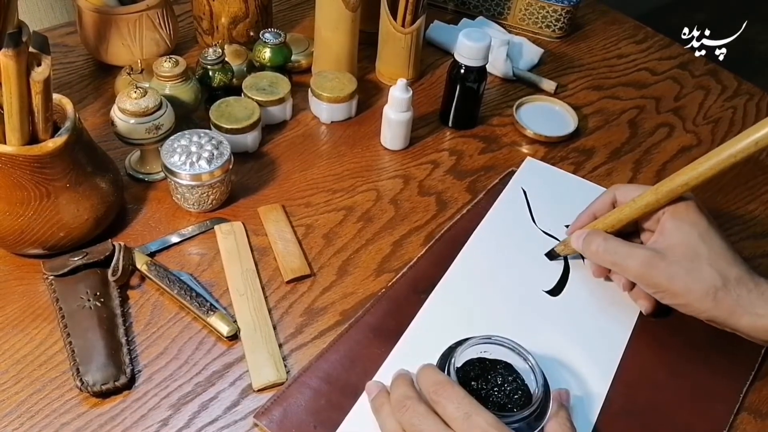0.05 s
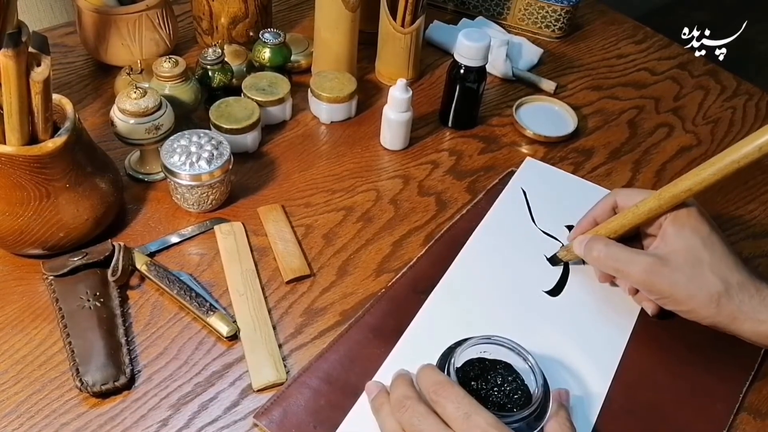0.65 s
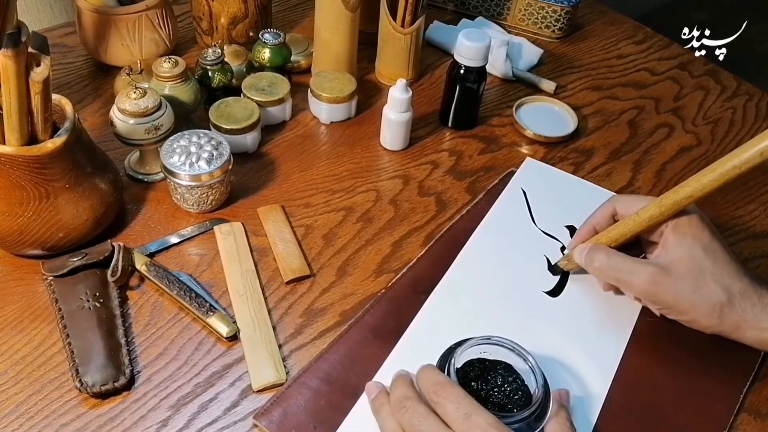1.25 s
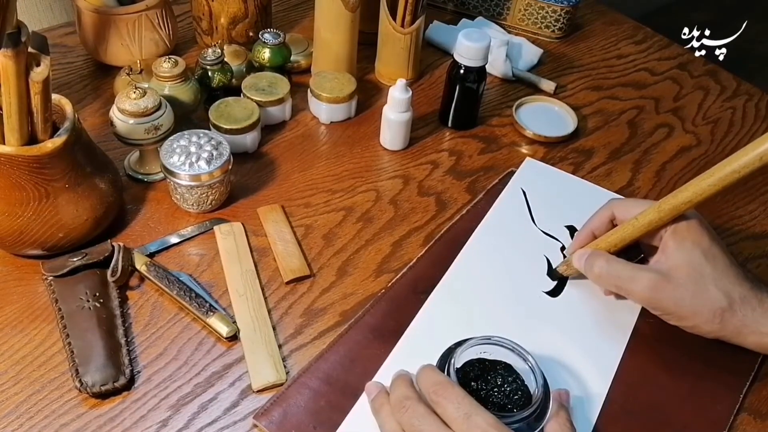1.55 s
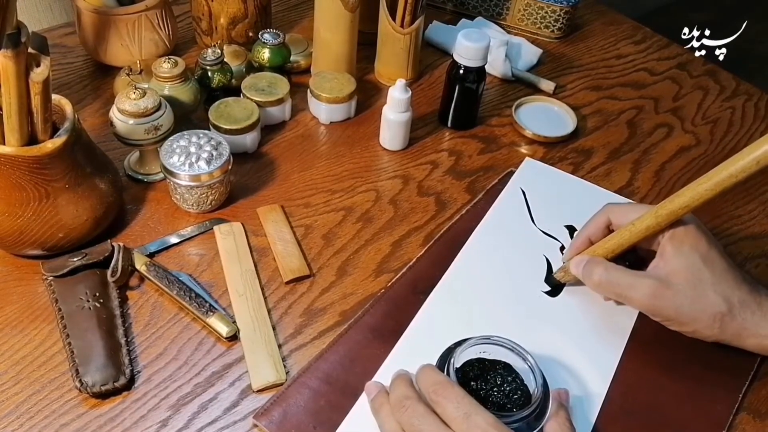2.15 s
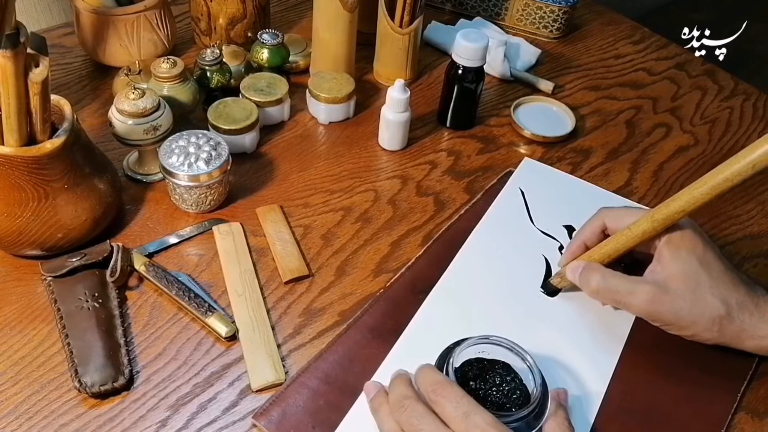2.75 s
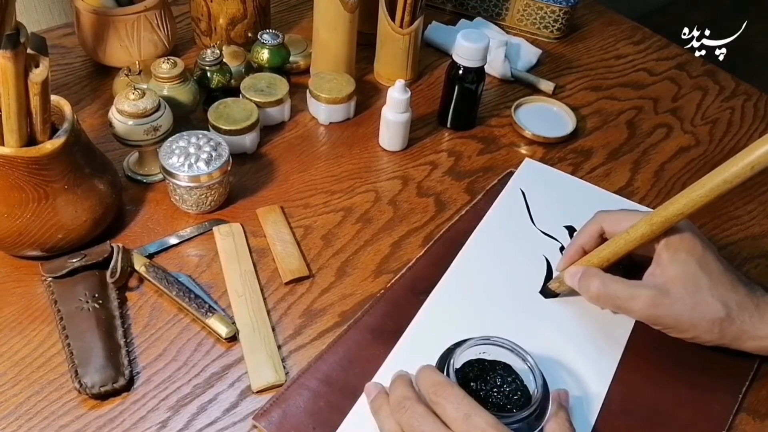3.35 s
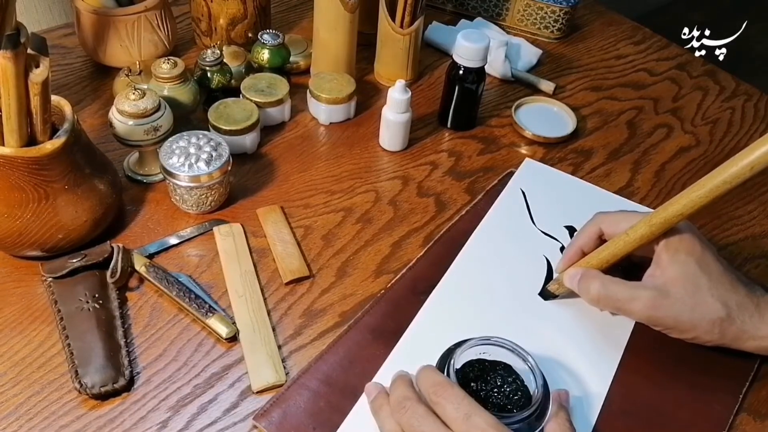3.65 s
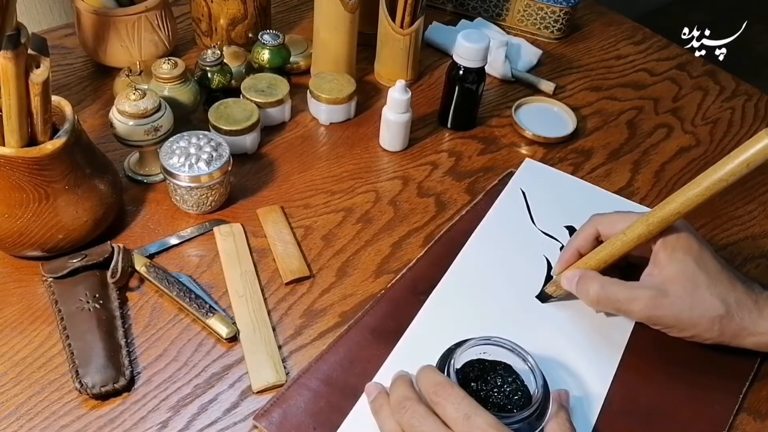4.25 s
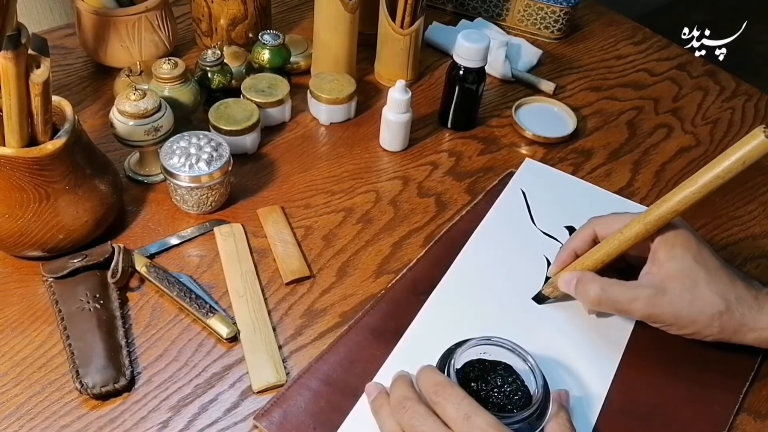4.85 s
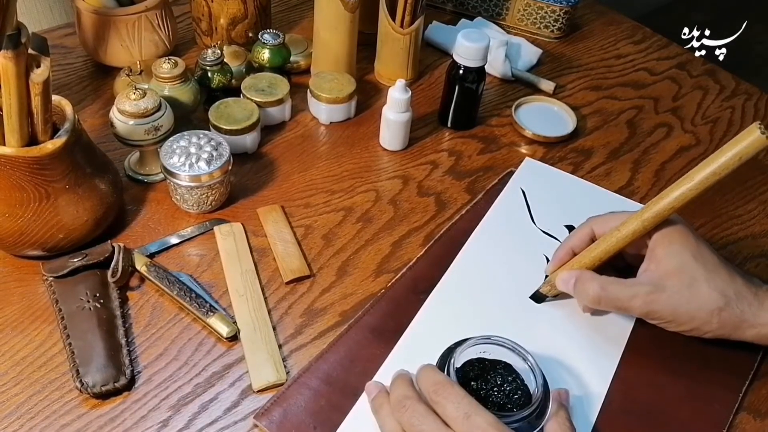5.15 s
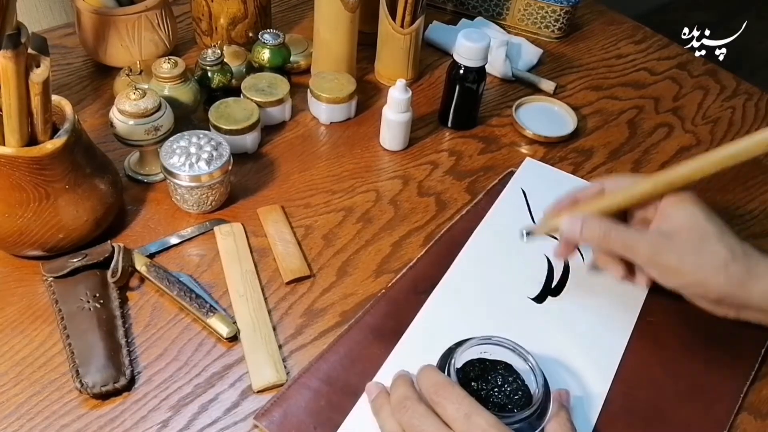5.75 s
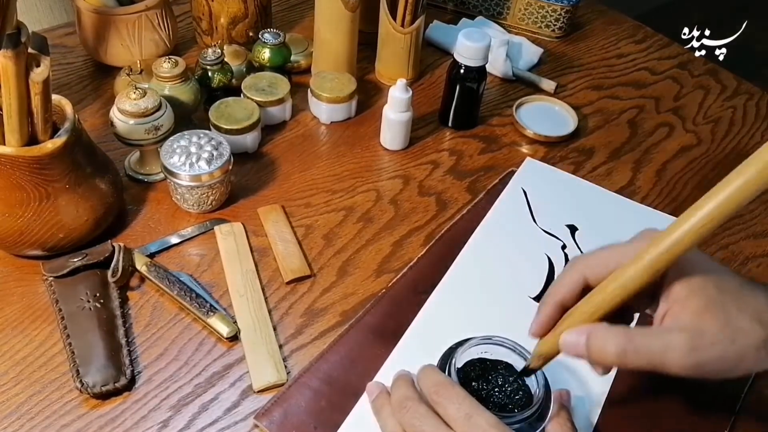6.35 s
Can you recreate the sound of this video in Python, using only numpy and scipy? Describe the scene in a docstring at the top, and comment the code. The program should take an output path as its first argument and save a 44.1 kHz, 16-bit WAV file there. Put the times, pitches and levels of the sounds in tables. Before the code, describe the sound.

Short, high squeaks of a reed nib dragged over glossy paper, the second stroke hoarser, with a soft machine hum behind.

```python
'''A machine hums and throbs in a small quiet room, and glossy paper rustles faintly on a wooden desk.
A reed pen is drawn slowly over it in two strokes, the nib sticking and slipping in short squeaks:
a light grip gives thin whistles, a firm one full reedy tones, and the second stroke is lower and hoarser.
The hands shift on the desk with a dull rumble, and three faint hollow tones come and go.'''
import sys
import numpy as np
from scipy import signal
from scipy.fft import rfft, irfft, next_fast_len
from scipy.io import wavfile

SR = 44100
rng = np.random.default_rng(int(sys.argv[2]) if len(sys.argv) > 2 else 0)


def output_pcm(signal):
    """Save a mono or channel-first signal as 16-bit PCM at the path in sys.argv[1].

    Samples are clipped to [-1, 1] before scaling.
    """
    pcm = np.clip(np.atleast_2d(signal).T, -1, 1) * 32767
    wavfile.write(sys.argv[1], SR, np.round(pcm).astype(np.int16))


N = 282636
TIME = np.arange(N) / SR
LEAD_S = .008   # space either side of a squeak for its fades


def from_db(db):
    """Decibels to gain."""
    return 10 ** (np.asarray(db) / 20)


def rms_one(x):
    """Scale to rms 1."""
    return x / np.sqrt(np.mean(x ** 2) + 1e-20)


def at_hz(points, hz):
    """Read a table of frequency and value on a log-frequency axis."""
    knots, values = np.transpose(points)
    return np.interp(np.log(np.maximum(hz, 1)), np.log(np.maximum(knots, 1)), values)


def curve(rows, seconds):
    """Read each column of an automation table at these times."""
    knots, *columns = np.transpose(rows)
    return [np.interp(seconds, knots, column) for column in columns]


def bins(size):
    """Frequencies of a spectrum of this many samples."""
    return np.arange(size // 2 + 1) * SR / size


def coloured(x, spectrum):
    """Equalise by a table of frequency in Hz and gain in dB."""
    size = x.shape[-1]
    return irfft(rfft(x) * from_db(at_hz(spectrum, bins(size))), size)


def drift(rate_hz, size):
    """Smooth random modulation, rms near 1, that moves at about this rate."""
    padded = next_fast_len(size + SR // 10)
    spectrum = rfft(rng.standard_normal(padded)) / (1 + (bins(padded) / rate_hz) ** 2)
    return rms_one(irfft(spectrum, padded))[:size]


def add(track, start_s, sound):
    """Mix a sound into a track."""
    i = max(round(start_s * SR), 0)
    track[i:i + len(sound)] += sound[:max(N - i, 0)]


def room_noise(spectrum):
    """Diffuse stereo noise at rms 1: centred in the bass, wide in the treble."""
    # Each row: frequency in Hz, correlation of left and right.
    likeness = [(30, .92), (150, 0.88), (280, 0.71), (500, 0.49), (1000, -0.091), (3000, -0.042),
                (16000, 0.21)]
    size = next_fast_len(N)
    alike = at_hz(likeness, bins(size))
    mid, side = rfft(rng.standard_normal((2, size)))
    pair = np.sqrt(1 + alike) * mid + np.sqrt(1 - alike) * side * [[1], [-1]]
    return rms_one(irfft(pair * from_db(at_hz(spectrum, bins(size))), size)[:, :N])


def machine_hum(throb_hz=5.3, throb_db=5.0, throb_peak_s=.02, waver_hz=6.0, usual_db=-54):
    """A machine in the background: five low tones that throb together and waver separately."""
    # The hum's tones. Each row: frequency in Hz, offset in dB, share of the level swing it follows.
    tones = [(65, -13.5, .6), (101.2, -11.5, 0.84), (122.6, -13, 0.4), (170, -13, .3), (199.6, -3, 1)]
    # The level ride under the throb. Each row: time in seconds, level in dB.
    ride = [(0, -54), (1.1, -54), (1.35, -59), (2.3, -55.5), (2.45, -45.5), (2.87, -52), (3.1, -64.5),
            (3.22, -46), (3.53, -58), (3.76, -44.5), (3.8, -67), (4.6, -65.5), (4.74, -52.5), (4.96, -46),
            (5.22, -54), (5.5, -47.5), (5.8, -50), (6.4, -52)]
    throb = throb_db * np.cos(2 * np.pi * throb_hz * (TIME - throb_peak_s))
    swing_db = curve(ride, TIME)[0] + throb - usual_db
    hum = 0
    for hz, offset_db, follows in tones:
        turns = hz * TIME + .05 * drift(waver_hz, N) + rng.random()
        level_db = usual_db + offset_db + follows * swing_db + 2.0 * drift(waver_hz, N)
        hum = hum + np.sqrt(2) * from_db(level_db) * np.sin(2 * np.pi * turns)
    return hum


def still_air(level_db=-62):
    """Room tone: a soft, even bed of noise."""
    # Each row: frequency in Hz, relative noise density in dB.
    air_colour = [(25, -5.5), (100, -5), (250, -13), (500, -17.5), (1000, -22.5), (1700, -25.5),
                  (3000, -29), (3900, -35.5), (5200, -33), (8000, -35), (11000, -40.5), (14800, -36),
                  (16000, -38)]
    return from_db(level_db) * room_noise(air_colour)


def room_and_hand_rumble(steady_rub_db=-7.5, shift_rub_db=-10.5):
    """The room's low rumble and a dull rub, both swelling as the hands shift on the desk."""
    # The room's rumble. Each row: time in seconds, level in dB.
    ride = [(0, -52.5), (1, -57), (1.6, -59.5), (2.3, -55.5), (3.5, -56.5), (3.9, -57.5), (4.6, -57.5),
            (5.1, -53), (6.4, -53.5)]
    # Hand movements. Each row: middle in seconds, half-width in seconds, peak level in dB.
    hand_shifts = [(0.537, 0.068, -57), (1.097, 0.078, -54), (2.462, 0.079, -45.5), (2.687, 0.095, -44.5),
                   (2.857, 0.049, -42), (3.282, 0.03, -48), (4.522, 0.047, -49), (4.787, 0.13, -47.5),
                   (4.95, 0.074, -49.5), (5.13, 0.057, -52.5), (5.52, 0.12, -58)]
    # Colours of rumble and rub. Each row: frequency in Hz, relative noise density in dB.
    rumble_colour = [(15, -26.5), (26, -4.5), (34, 2.5), (48, -26.5), (58, 0.5), (66, 1.5), (79, -19),
                     (99, -0.5), (110, -7.5), (126, 1.5), (150, -10.5), (172, -3), (200, -5.5), (260, -27),
                     (500, -57.5)]
    rub_colour = [(120, -16.5), (230, 0.5), (280, 0), (345, -1), (420, -4.5), (480, -4.5), (550, -14.5),
                  (640, -5.5), (760, -16), (950, -13.5), (1300, -19), (1700, -35), (3000, -41.5),
                  (5000, -56.5)]
    steady = from_db(curve(ride, TIME)[0])
    shifts = sum(from_db(db) * np.exp(-((TIME - middle) / width) ** 2)
                 for middle, width, db in hand_shifts)
    rumble = np.hypot(steady, shifts) * room_noise(rumble_colour)
    rub_level = np.hypot(from_db(steady_rub_db) * steady, from_db(shift_rub_db) * shifts)
    return rumble + rub_level * room_noise(rub_colour)


def paper_rustle(gain_db=2.0, grain_db=2.0, rise_s=.006):
    """Nib and hand brush the paper: grainy hiss that comes quickly and fades."""
    # Each row: start in seconds, time constant of the fading power in seconds, relative level in dB.
    brushes = [(.08, 0.017, -67), (.21, 0.037, -64), (.45, 0.081, -73), (2.395, 0.015, -56.5),
               (2.518, 0.019, -57), (2.59, 0.0077, -54.5), (2.699, 0.029, -65.5), (4.703, .011, -58),
               (5.027, 0.0098, -62), (5.509, 0.12, -70.5), (5.795, .017, -86), (6.265, 0.012, -55),
               (6.335, 0.05, -67.5)]
    # Each row: frequency in Hz, relative noise density in dB.
    paper_colour = [(1500, -17), (2500, -0.5), (4000, -10), (5200, 0.5), (8000, 7), (10000, -13),
                    (13000, -12), (16000, -31)]
    envelope, t = np.zeros(N), TIME[:SR // 2]
    for start, fade_s, db in brushes:
        add(envelope, start, from_db(db + gain_db) * np.tanh(t / rise_s) * np.exp(-t / fade_s / 2))
    grain = rms_one(from_db(grain_db * drift(300, N)))
    return envelope * grain * room_noise(paper_colour)


def squeak(length, level_db, slip_hz, glide, sag, swell_db, odd_db, tilt_db, rough):
    """One run of stick-slip cycles: partials that glide in, then sag and turn hoarse as the nib lets go."""
    # Resonances of reed and paper. Each row: frequency in Hz, gain in dB.
    reed_response = [(1600, -34.5), (2200, -4), (2550, -13.5), (3000, -15), (3500, -4), (4200, -19),
                     (4700, -8.5), (5200, -1.5), (6200, 5.5), (7650, -4), (8800, 1), (10200, -15),
                     (12500, -25), (15500, -28)]
    # Hiss under the nib. Each row: frequency in Hz, relative noise density in dB.
    hiss_colour = [(1000, -46), (4000, -24), (6500, -4), (9000, -5.5), (11500, -12.5), (15000, 0.5)]
    size = next_fast_len(round((length + 2 * LEAD_S) * SR))
    t = np.arange(size) / SR - LEAD_S
    along = np.clip(t / length, 0, 1)
    hoarse = rough * (.85 + .4 * along ** 2)
    # Paper fibres catch the nib unevenly: pitch and level rise and fall together.
    fibres = drift(91, size)
    fibres = fibres - fibres.mean()
    bend = (.009 + .036 * rough) * fibres
    flutter_db = 7.0 * np.sqrt(rough) * np.tanh(fibres)
    # In the last moments the nib loses its grip and the pitch dives.
    dive = .12 * rough * np.exp(np.minimum(t - length, 0) / .002)
    contour = 1 + glide * (1 - along) ** 2 - sag * along ** 6 - dive
    jitter = .04 * hoarse * drift(830, size)
    phase = 2 * np.pi * np.cumsum(slip_hz * contour * (1 + bend + jitter)) / SR
    tone = sum(from_db(odd_db * (k % 2) + tilt_db * np.log2(k))
               * np.sin(k * phase + 2 * np.pi * rng.random()) for k in range(1, 8))
    # Each slip puffs friction noise from the reed and, under firm pressure, from the paper.
    puffs = rng.standard_normal((2, size)) * (1 + np.cos(phase))
    scrape = from_db(-9.0) * hoarse ** 2 * 2 * rms_one(coloured(puffs[0], reed_response))
    hiss = from_db(-18.5 + odd_db / 2) * np.sqrt(rough) * rms_one(coloured(puffs[1], hiss_colour))
    voice = rms_one(coloured(tone, reed_response)) + scrape + hiss
    edge_s = .0035 / (1 + 3 * rough)   # clean whistles start and stop more softly than scratches
    gate = (1 + np.tanh(t / edge_s)) * (1 + np.tanh((length - t) / edge_s))
    sound = voice * gate * from_db(swell_db * along + flutter_db)
    return from_db(level_db) * sound / np.sqrt(np.sum(sound ** 2) / (length * SR))


def squeak_voicing(start, level_db, grip, breakaway, usual_db=-28):
    """Grip, loudness, the next catch and the place along the stroke set a squeak's pitch and colour."""
    # The nib's base voicing along the strokes. Each row: time in seconds, slip rate in Hz under a light
    # grip, the same under a firm grip, roughness from 0 to 1, tilt of the partials in dB per octave.
    strokes = [(.6, 2687, 2708, .14, 3.5), (1.15, 2670, 2557, 0.28, 2), (1.45, 2658, 2571, 0.21, 2.2),
               (1.85, 2611, 2565, 0.14, 1.5), (2.08, 2514, 2524, 0.35, 3), (2.5, 2497, 2547, .2, -4),
               (2.9, 2208, 2458, .45, 3.5), (3.15, 2096, 2296, 0.8, 5), (3.38, 2020, 2326, .55, 5),
               (3.73, 1855, 2266, .66, 4.5), (3.96, 1930, 2008, .52, 5), (4.06, 1695, 2239, 0.3, 6.5),
               (4.2, 1860, 2062, .78, 4), (4.31, 1700, 2218, .62, 6.5), (4.53, 2200, 2335, .24, 4)]
    light_hz, firm_hz, rough, tilt_db = curve(strokes, start)

    def by_grip(light, firm):
        return light + (firm - light) * grip

    rough = by_grip(.59, 1) * rough
    scatter = .02496 * rough * rng.standard_normal()
    return dict(
        slip_hz=by_grip(light_hz, firm_hz) * (1 + scatter),
        glide=by_grip(.0056, -.02) + .0556 * rough,   # light or rough squeaks fall, clean firm ones arch
        sag=.019 + .17 * rough ** 2 + .077 * breakaway,
        swell_db=by_grip(11.5, 1),   # a light whistle builds up, a firm squeak starts at once
        odd_db=by_grip(-34, 0),   # a light nib slips twice a cycle and loses its odd partials
        tilt_db=tilt_db + by_grip(-6, 0) + .25 * (level_db - usual_db),   # firmer or louder is brighter
        rough=rough)


def pen(catch_s=.008):
    """The reed nib sticks and slips along both strokes: a mono track of squeaks."""
    # Each row: start in seconds, length in seconds, level in dB, grip from 0 (light) to 1 (firm).
    squeaks = [(0.331, 0.033, -62.5, 0.87), (0.455, 0.035, -55.5, .45), (0.572, 0.024, -48.5, 0.1),
               (0.594, 0.021, -26.5, 0.01), (0.725, 0.013, -54.5, 0.73), (0.739, 0.014, -27, 0.08),
               (0.846, 0.032, -52.5, 0.73), (0.882, 0.011, -27.5, 0), (0.994, 0.014, -34.5, 0.53),
               (1.022, 0.0088, -27, 0.52), (1.102, 0.022, -34, 0.23), (1.122, 0.034, -25, 0.12),
               (1.159, 0.021, -30.5, 0.75), (1.247, 0.019, -34.5, 0.3), (1.272, 0.025, -27.5, 1),
               (1.294, .03, -29.5, 0.83), (1.349, .008, -33, 0.33), (1.391, 0.018, -33, 0.55),
               (1.429, 0.019, -26.5, 0.79), (1.453, 0.022, -25, 1), (1.561, 0.022, -27, 0.98),
               (1.585, 0.031, -27.5, 0.99), (1.619, 0.013, -30.5, 0.99), (1.709, 0.0084, -26, 0.5),
               (1.719, 0.033, -27, 0.96), (1.756, 0.019, -32.5, 0.98), (1.851, .016, -25, 0.09),
               (1.869, 0.039, -28, 1), (1.99, 0.0048, -38, 0.5), (2.022, 0.014, -26.5, .85),
               (2.056, 0.023, -29, 0.88), (2.085, 0.0092, -27, 1), (2.192, 0.0046, -30.5, 0.45),
               (2.218, 0.015, -33, 0.07), (2.239, 0.0082, -40, 0.97), (2.259, 0.01, -27.5, 1),
               (2.388, 0.0067, -49, 0), (2.493, 0.0055, -48.5, 0), (2.532, 0.0098, -57, 0.4),
               (2.578, 0.011, -67, 0.6), (2.691, 0.0091, -63, 0.5), (2.883, .012, -32, .45),
               (2.899, 0.027, -28, 0.99), (2.928, .014, -36.5, 0.99), (3.078, 0.0052, -41.5, 1),
               (3.114, 0.0064, -35.5, 0.16), (3.149, .012, -28.5, 0.94), (3.278, 0.0035, -29.5, 0.92),
               (3.3, 0.0086, -27.5, 0.99), (3.326, 0.0087, -25.5, 0.97), (3.35, .027, -28, 0.9),
               (3.385, 0.023, -30, 0.97), (3.488, 0.0028, -33, 0.53), (3.516, 0.012, -28, 0.93),
               (3.531, 0.014, -26, 0.97), (3.561, 0.0054, -32, 0.53), (3.592, 0.0044, -36.5, 0.49),
               (3.701, 0.0022, -32, 0.46), (3.709, .024, -26, 0.99), (3.746, 0.016, -29.5, .8),
               (3.854, 0.014, -25, 0.94), (3.899, 0.0079, -29, 0.96), (3.933, 0.011, -29.5, 1),
               (3.974, 0.012, -29, 1), (4.052, 0.0087, -32.5, 0.03), (4.058, 0.024, -25.5, 0.97),
               (4.097, 0.0075, -35.5, .85), (4.165, 0.0049, -27.5, 0.9), (4.187, .01, -33.5, 0.98),
               (4.205, 0.0074, -40, 0.83), (4.243, 0.0055, -33.5, .8), (4.265, .006, -32.5, 0.5),
               (4.282, 0.0064, -30.5, 0.5), (4.3, 0.025, -26, 0.9), (4.524, 0.023, -28.5, 0.97)]
    starts, lengths, _, grips = np.transpose(squeaks)
    gaps = np.maximum(starts[1:] - starts[:-1] - lengths[:-1], 0)
    # Breakaway nears 1 when the nib catches again firmly and at once; it deepens the pitch sag.
    breakaways = np.append(grips[1:] * np.exp(-gaps / catch_s), 0)
    track = np.zeros(N)
    for (start, length, level_db, grip), breakaway in zip(squeaks, breakaways):
        voicing = squeak_voicing(start, level_db, grip, breakaway)
        add(track, start - LEAD_S, squeak(length, level_db, **voicing))
    return track


def desk_stereo(x):
    """Reflections from the desk push each frequency to one side or the other."""
    # Each row: frequency in Hz, left minus right in dB.
    balance = [(1800, -0.5), (2600, -7.5), (3900, -3), (4750, -21), (5300, -5.5), (6000, 20), (7000, -7),
               (7700, -13), (8800, 3.5), (10200, 7.5), (11200, 1.5), (15000, 1)]
    # Each row: frequency in Hz, phase lead of the left side in radians.
    phase_lead = [(1500, -1.77), (2500, -2), (4740, -2.17), (5200, -1.4), (5940, -3.5), (6800, -4),
                  (7670, -6), (8300, -6.5), (9900, 0.3), (16000, -2.5)]
    size = next_fast_len(N)
    sides = np.array([[.5], [-.5]])
    gains = from_db(sides * at_hz(balance, bins(size)))
    gains = gains / np.sqrt(np.mean(gains ** 2, axis=0))
    turn = np.exp(1j * sides * at_hz(phase_lead, bins(size)))
    return irfft(rfft(x, size) * gains * turn, size)[:, :N]


def room_reverb(x, early_db=-8.5, early_t60=.16, late_db=-17.0, late_t60=.36, predelay_s=.0015):
    """Quick reflections from the things on the desk, then the short tail of the room."""
    t = TIME[:SR // 2]
    fade_in = np.clip((t - predelay_s) / .0032, 0, 1)
    response = 0
    for db, t60 in ((early_db, early_t60), (late_db, late_t60)):
        echoes = rng.standard_normal((2, len(t))) * fade_in * from_db(-60 * t / t60)
        response = response + from_db(db) * rms_one(echoes) / np.sqrt(len(t))
    return signal.fftconvolve(x[None], response, axes=1)[:, :N]


def hollow_tones():
    """Faint, brief hollow tones: narrow resonant noise that swells and sinks."""
    # Each row: middle in seconds, half-width in seconds, pitch in Hz, peak level in dB.
    tones = [(2.627, 0.072, 680, -67), (2.777, 0.053, 348, -51), (3.865, 0.085, 640, -64.5)]
    # The resonance. Each row: multiple of the pitch, gain in dB.
    band = [(.6, -52), (.88, -18.5), (1, 1), (1.12, -26), (1.6, -66)]
    track = np.zeros(N)
    for middle, width, hz, db in tones:
        ring = coloured(rng.standard_normal(SR), [(hz * ratio, gain) for ratio, gain in band])
        swell = np.exp(-2 * ((TIME[:SR] - .5) / width) ** 2)
        add(track, middle - .5, from_db(db) * rms_one(ring) * swell)
    return track


def scene():
    """Pen and paper up close, over a bed of hum, rumble and air."""
    nib = pen()
    foreground = desk_stereo(nib) + room_reverb(nib) + paper_rustle() + hollow_tones()
    return foreground + machine_hum() + room_and_hand_rumble() + still_air()


def record(dry):
    """A steep low-pass takes off everything above 16 kHz."""
    return signal.sosfiltfilt(signal.ellip(10, .05, 60, 16000, fs=SR, output="sos"), dry)


dry = scene()
out = record(dry)
output_pcm(out)
```